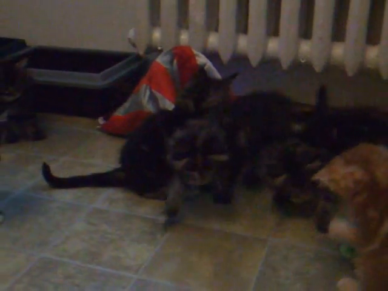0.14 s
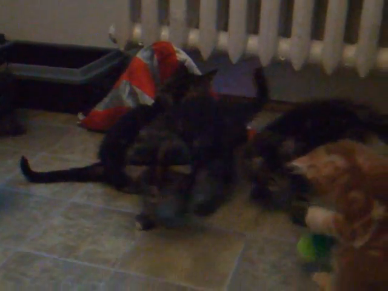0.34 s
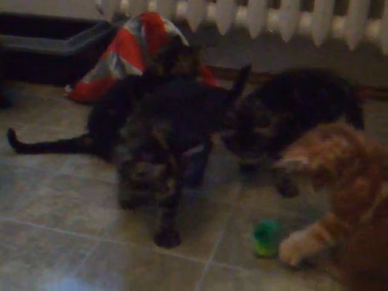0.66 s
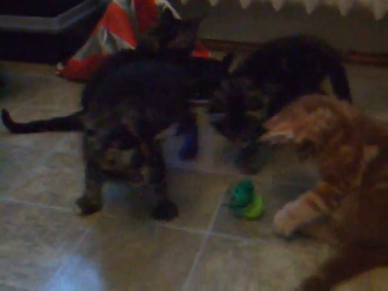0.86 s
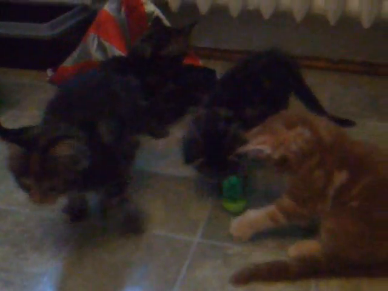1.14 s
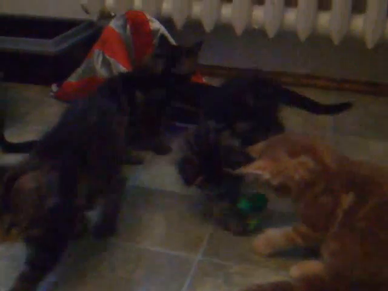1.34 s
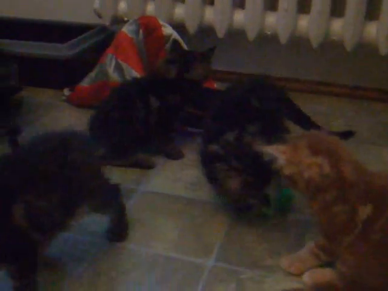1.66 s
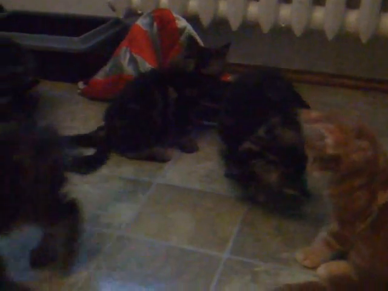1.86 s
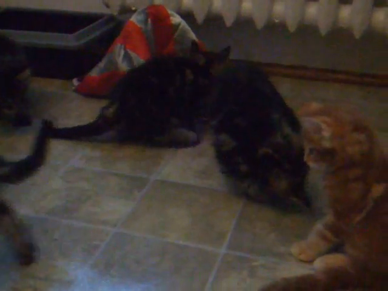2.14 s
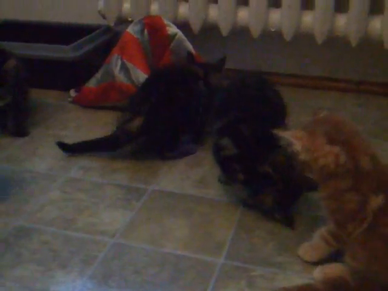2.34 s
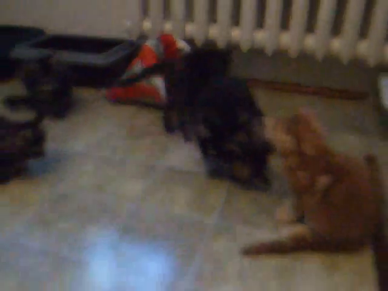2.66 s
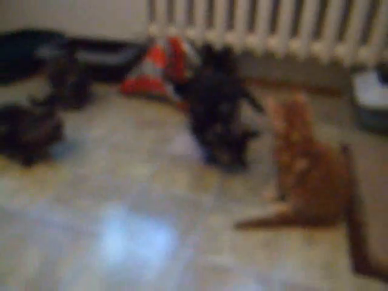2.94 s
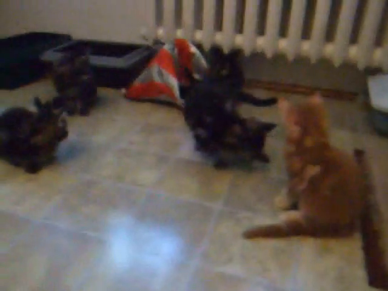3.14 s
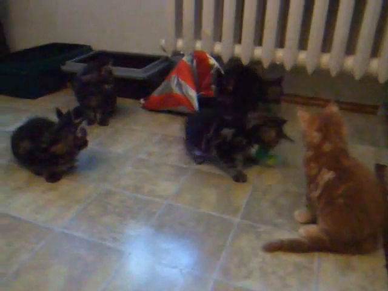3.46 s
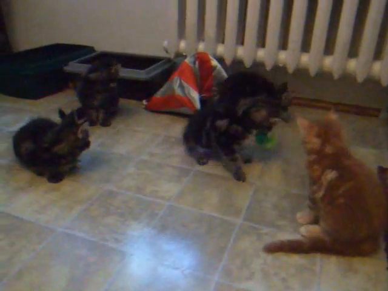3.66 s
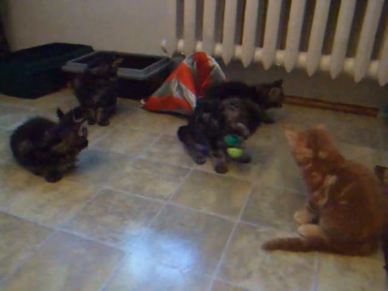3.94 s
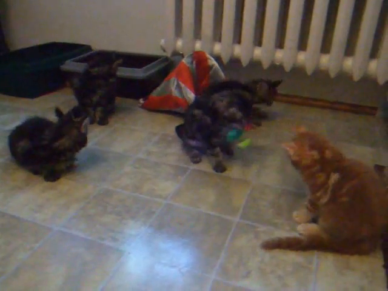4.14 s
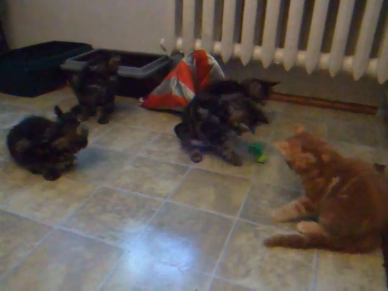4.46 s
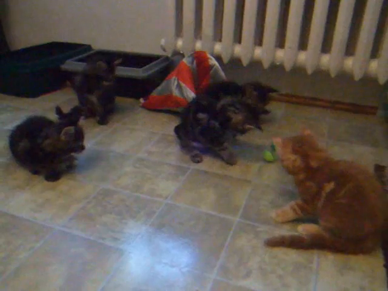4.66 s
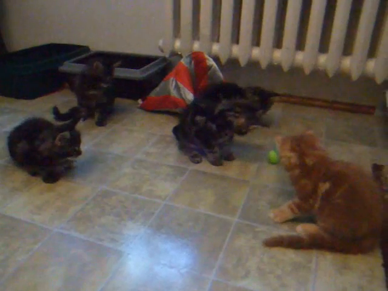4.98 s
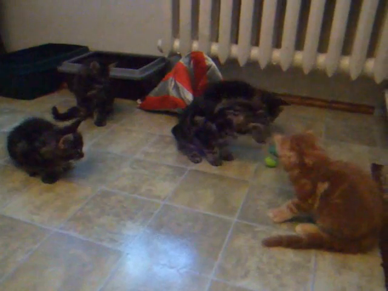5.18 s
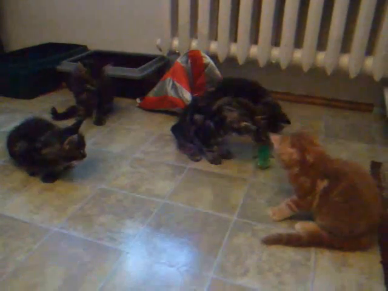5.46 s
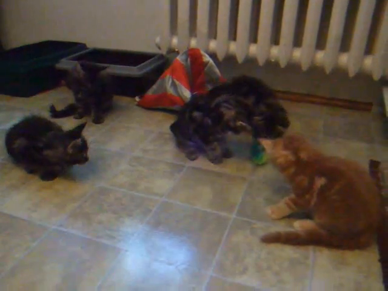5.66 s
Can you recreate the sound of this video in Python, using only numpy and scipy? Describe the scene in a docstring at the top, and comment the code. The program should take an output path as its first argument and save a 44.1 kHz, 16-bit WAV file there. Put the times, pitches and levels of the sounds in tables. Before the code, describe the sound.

Close, dry focus-motor ticks run in quick uneven strings from the start, with a hard toy knock echoing in a bare tiled room. Paws shuffle softly, then a zoom motor whirs and grinds with clunks for about half a second. Ticks resume, with a second knock later. The cheap built-in microphone adds hiss, a thin electric whine and harsh, grainy treble.

```python
"""A small camera films kittens on a tile floor. Focus motor steps tick on the picture frames from the start;
a hard toy knocks in the bare room at 0.5 s and paws shuffle from 1.4 s. From 2.5 s the zoom motor whirs on
grinding gears, which coast and grind again to 3.1 s; then focus ticks resume, with a second knock at 4.5 s.
Hiss, an electric whine and two fuzzy tones run throughout. The recorder takes 8-bit samples at a quarter
rate and holds each value, which mirrors all sound into the treble."""
import sys
import numpy as np
from scipy import signal
from scipy.fft import rfft, irfft
from scipy.io import wavfile
from scipy.ndimage import uniform_filter1d

SR = 44100
rng = np.random.default_rng(int(sys.argv[2]) if len(sys.argv) > 2 else 0)


def transcribe(signal):
    """Save signal, clipped to [-1, 1], as a 16-bit WAV file at the path in sys.argv[1]."""
    frames = np.atleast_2d(signal).T
    limited = np.clip(frames, -1, 1)
    pcm = np.round(limited * 32767).astype(np.int16)
    wavfile.write(sys.argv[1], SR, pcm)


N = 256220

# Focus steps. Each row: start in s, clack peak in dB, clack in Hz, shell thud in dB re clack before THUD_TRIM_DB.
STEPS = [(0.0034, -22.5, 2060, -23), (0.0713, -29, 1430, -1.5), (0.1372, -21, 2130, -32),
         (0.204, -35, 1960, 6.5), (0.27, -23, 2190, -29), (0.3374, -33.5, 2000, 7),
         (0.404, -26.5, 2180, -29), (0.47, -29.5, 1450, 2.5), (0.7024, -38, 1500, 1),
         (0.7353, -31, 1720, -9), (0.8042, -28.5, 1650, 0), (0.836, -26.5, 1540, -9),
         (0.8694, -25.5, 1690, -9.5), (0.9023, -29.5, 1670, -3), (0.936, -23.5, 1680, -14),
         (0.97, -24, 1720, -10.5), (1.0022, -23, 1610, -12.5), (1.036, -22.5, 1580, -13),
         (1.0694, -25, 1730, -11.5), (1.1025, -22.5, 1700, -9.5), (1.135, -24, 1810, -8),
         (1.1692, -21.5, 1730, -10.5), (1.2027, -23, 1620, -11), (1.27, -31, 1870, -1),
         (1.336, -21.5, 1750, -13), (3.1745, -19.5, 1700, -13.5), (3.2988, -22, 1690, -7),
         (3.374, -31, 1730, -18), (3.4366, -19, 1580, -15), (3.5032, -23, 1810, -12),
         (3.57, -31, 1700, -6.5), (3.6365, -22, 1770, -14), (3.703, -25.5, 1650, -7),
         (3.77, -21.5, 1720, -15), (3.8363, -27, 1620, -5.5), (3.903, -19, 1790, -15.5),
         (3.9703, -24, 1650, -9), (4.002, -25.5, 1600, -10.5), (4.035, -25, 1520, -16),
         (4.069, -22, 1680, -14), (4.1022, -26, 1710, -7.5), (4.169, -39, 1710, -2),
         (4.2019, -18, 1720, -18.5), (4.2357, -21, 1750, -17), (4.2692, -21.5, 1820, -19),
         (4.3017, -20, 1740, -16.5), (4.3349, -21.5, 1770, -18), (4.3682, -36, 1700, -24),
         (4.4361, -21.5, 1760, -10), (4.602, -27.5, 1750, -7), (4.6694, -25.5, 1740, -15),
         (4.702, -22, 1790, -16), (4.7352, -24.5, 1700, -15), (4.7691, -21, 1740, -25),
         (4.801, -24.5, 1740, -14), (4.835, -21.5, 1780, -20), (4.9022, -28.5, 1700, -7)]
# Lens barrel modes. Each row: frequency in Hz, relative level in dB, t60 in s.
BARREL_MODES = [(1745, 0, 0.067), (1432, 1, 0.033), (2072, -3.5, 0.034)]
# Camera shell modes. Each row: frequency in Hz, relative level in dB, t60 in s.
SHELL_MODES = [(856, 0, 0.044), (639, 0, 0.035), (1052, -1, 0.033)]
# Rasp of a step. Each row, zoomed in then out: level running, level from rest, in dB before RASP_TRIM_DB.
RASP_DB = [(-45, -35.5), (-42.5, -37)]
# Share of the clack's excess over CLACK_DB that the rasp takes on (ratio), zoomed in then out.
RASP_FOLLOWS = [0.57, 0.034]
# Rotor rebound. Each row, zoomed in then out: level running, level from rest, in dB.
REBOUND_DB = [(-35.5, -34.5), (-34.5, -36)]
# Barrel ring. Each row, zoomed in then out: level running, level from rest, in dB.
RING_DB = [(-37, -36), (-34.5, -31.5)]
# Random spread of rasp, rebound and ring, standard deviations in dB.
SCATTER_DB = np.array([1.5, 3.5, 2.2])
CLACK_DB, THUD_TRIM_DB, RASP_TRIM_DB = -27, -2.5, 8
REST_S = 0.05  # a step after a longer pause starts from rest, unless it runs on freely
ZOOMED_OUT_S = 2.5  # from here the lens sits further back in the barrel

# Focus motor running freely. Each row: start in s, stop in s, level in dB.
SLEWS = [(1.337, 1.357, -39.5), (3.183, 3.291, -43)]
# Modes of the free run. Each row: frequency in Hz, relative level in dB, t60 in s.
SLEW_MODES = [(1490, -1.5, 0.012), (1656, 0.5, 0.02), (2110, 1, 0.018), (2950, -4.5, 0.01)]
SLEW_STEPS_PER_S = 292

# Zoom motor. Each row: time in s, shaft rate in Hz, level of low and of high multiples in dB.
SHAFT = [(2.558, 128.2, -44, -51), (2.595, 125.6, -40.5, -48), (2.62, 125.9, -39.5, -46),
         (2.68, 128.4, -40, -44.5), (2.75, 130.2, -38, -45), (2.835, 132.8, -37, -42),
         (2.93, 133, -36.5, -43.5), (2.94, 137, -47, -55)]
# Low multiples of the shaft rate. Each row: multiple, relative level in dB before waver.
LOW_ORDERS = [(2, -15), (3, -13), (4, -9), (5, -8), (6, -11), (7, -12), (9, -17), (11, -12), (12, 0),
              (13, -19), (15, -15), (17, -19), (18, -16)]
# High multiples of the shaft rate. Each row: multiple, relative level in dB before waver.
HIGH_ORDERS = [(21, -10), (24, -5), (25, -5), (27, 0), (29, -8), (30, -5), (39, -6)]
# Zoom gears, loud as they engage and stop, coasting between two runs. Each row: time in s, grinding in dB.
GEARS = [(2.49, -56), (2.5, -37.5), (2.554, -32), (2.6, -40), (2.834, -39), (2.898, -38.5), (2.942, -34),
         (2.95, -40), (3.01, -44.5), (3.021, -31.5), (3.101, -34), (3.108, -41)]
# Spectrum of the grinding. Each row: frequency in Hz, relative density in dB per Hz.
GRIND_TONE = [(410, -24.5), (700, -8), (930, -25.5), (1050, -17), (1220, -16.5), (1620, -9), (1840, -20.5),
              (3570, -12.5), (4210, -13.5), (4630, -19), (5500, -10), (7150, -44), (12100, -120)]
# Housing rumble as the zoom jolts. Each row: peak in s, level in dB, t60 in s.
JOLTS = [(2.556, -39, 0.7), (2.834, -41, 0.11), (2.944, -41, .3), (3.092, -39.5, .06)]
JOLT_RISE_DB_PER_S, GEAR_HUM_DB, GEAR_RUMBLE_DB = 598, -52.5, -63
# Gear clunks. Each row: start in s, snap level in dB, shell thump in dB re snap.
CLUNKS = [(2.4962, -27, -19), (2.532, -21.5, -11), (2.5569, -16.5, 2), (2.9374, -21.5, -16),
          (3.021, -22, -30), (3.072, -25, -2), (3.0788, -27, -11), (3.1004, -33, 2)]
# Shell hums up as gears bind or the focus motor runs. Each row: start in s, length in s, peak in dB.
HUMS = [(2.516, 0.039, -31), (2.934, 0.016, -28), (3.009, 0.012, -36.5), (3.038, 0.023, -29.5),
        (3.099, 0.01, -24.5), (3.182, 0.1, -45.5)]

# Toy knocks. Each row: start in s, blow in dB, room in dB before build-up, build-up time in s.
KNOCKS = [(0.4979, 5.5, -17, 0.0075), (4.4557, 5, -12, 0.046)]
# Modes of the blow, one list a knock. Each row: frequency in Hz, level in dB re blow, t60 in s.
BLOW_MODES = [
    [(1285, 6, 0.0035), (2600, -16, 0.0076), (4660, -12, 0.0042)],
    [(2480, -1.5, 0.0053), (3020, 3, 0.0049), (1490, -15, 0.023), (4030, -3.5, 0.0057), (540, -20, 0.0081)],
]
# Room tail spectrum, one list a knock. Each row: frequency in Hz, relative density in dB per Hz.
KNOCK_TONES = [
    [(60, -45), (150, -41), (260, -10), (420, -7), (630, -2), (900, -9.5), (1300, -9.5), (1900, -12.5),
     (2700, -17.5), (3300, -30.5), (5500, -33)],
    [(40, -45), (85, -20.5), (130, -24), (200, -10.5), (300, -13.5), (400, -5), (700, -5.5), (1200, -14),
     (1750, -7), (2300, -10), (3000, -7.5), (3800, -19.5), (5500, -25)],
]
# Wall echoes, one list a knock. Each row: delay in s, level in dB re blow.
ECHOES = [
    [(.0035, -23), (.0117, -13), (.0148, -16), (.038, -14)],
    [(.0035, -9.5), (.0152, -10.5), (.030, -32), (.048, -21)],
]
# Room decay. Each row: frequency in Hz, t60 in s.
ROOM_T60 = [(150, 0.51), (300, 0.51), (700, 0.4), (1500, 0.46), (3000, 0.32), (5500, 0.46)]

# Paws and fur on the tiles. Each row: time in s, shuffle in dB.
PAWS = [(1.38, -57.5), (1.61, -46), (1.624, -36), (1.728, -51.5), (1.85, -56.5), (1.944, -45),
        (1.99, -52.5), (2.16, -59), (2.4, -63.5)]
# Shuffle spectrum. Each row: frequency in Hz, relative density in dB per Hz.
PAW_TONE = [(71, -46), (120, -21), (145, -37), (161, -11), (380, -1), (654, -11), (898, -17), (2000, -28.5),
            (2600, -62), (4400, -120)]
# Dull thumps of paws on the floor and of the zoom gears as they jolt and stop.
# Each row: start in s, level in dB, frequency in Hz.
BUMPS = [(1.621, -40, 382), (1.651, -30, 401), (1.749, -38, 357), (1.94, -33, 560), (2.555, -21, 570),
         (2.835, -36, 278), (2.945, -32, 127), (2.965, -29.5, 224), (2.974, -35, 229.2), (2.981, -38, 269),
         (3.798, -34, 112)]

# Two fuzzy tones. Each row: time in s, shell hum and faint whistle in dB before waver.
FUZZ = [(0.0, -58, -62.5), (0.75, -53, -67.5), (1.05, -49, -68.5), (1.3, -55.5, -55), (1.49, -51, -61.5),
        (2.08, -59, -61.5), (2.45, -56.5, -59.5), (3.15, -60, -51.5), (3.53, -56.5, -57.5),
        (4.4, -62, -57.5), (4.95, -64, -64), (5.2, -60, -52.5), (5.81, -61, -58)]
FUZZ_WAVER_DB = 2
# Hiss spectrum. Each row: frequency in Hz, relative density in dB per Hz.
HISS_TONE = [(15, -25), (25, -2), (111, 0.5), (286, -5), (343, -4), (439, -6.5), (481, -8.5), (826, -6),
             (1010, -7.5), (1390, -11.5), (2390, -11), (2860, -10), (3200, -5.5), (4010, -10.5),
             (5500, -11), (7150, -44), (12100, -120)]
# Bumps in the hiss spectrum. Each row: frequency in Hz, width in Hz, level in dB.
HISS_BUMPS = [(2873, 150, -55.5), (4080, 340, -55.5), (5285, 340, -54)]
HISS_DB = -48.5  # before the patches
WHINE_HZ, WHINE_RMS_DB = 3907.5, -55.5

HOLD_SAMPLES = 4
LEVELS = 128  # 8-bit steps from zero to full scale
BAND_HZ, EDGE_HZ = 5450, 15560


def amp(db):
    """Decibels to amplitude ratio."""
    return 10 ** (np.asarray(db) / 20)


def evened(x):
    """Scales x to unit RMS."""
    return x / np.sqrt(np.mean(x ** 2) + 1e-20)


def noise(count):
    """White noise of unit variance."""
    return rng.standard_normal(count)


def smoothed_twice(x, size):
    """Two running means in a row."""
    return uniform_filter1d(uniform_filter1d(x, size=size), size=size)


def read(points, hz):
    """Interpolates a table over log frequency."""
    f, value = np.transpose(points)
    return np.interp(np.log(hz + 1), np.log(f + 1), value)


def add(mix, start_s, sound):
    """Adds sound into mix in place, cut at the end."""
    part = mix[max(round(start_s * SR), 0):][:len(sound)]
    part += sound[:len(part)]


def coloured(x, tone):
    """Filters x by a spectrum, nothing above the recorder's band, to unit RMS."""
    hz = np.fft.rfftfreq(len(x), 1 / SR)
    in_band = hz < SR / HOLD_SAMPLES / 2
    return evened(irfft(rfft(x) * amp(read(tone, hz)) * in_band, len(x)))


def fuzzy(count, hz, width_hz):
    """Noise through one narrow two-pole resonance."""
    r = np.exp(-np.pi * width_hz / SR)
    poles = [1, -2 * r * np.cos(2 * np.pi * hz / SR), r * r]
    return evened(signal.lfilter([1, 0, -1], poles, noise(count)))


def ring(modes, t, rise_s):
    """Struck modes decaying from a soft start, phases random."""
    swing = sum(amp(db - 60 * t / t60_s) * np.sin(2 * np.pi * (hz * t + rng.random()))
                for hz, db, t60_s in modes)
    return swing * (1 - np.exp(-t / rise_s))


def columns(rows):
    """Start time, short end fades and interpolated columns of a curve table."""
    s, *values = np.transpose(rows)
    t = np.arange(s[0], s[-1], 1 / SR)
    fade = signal.windows.tukey(len(t), min(0.002 * SR / len(t), 1))
    return s[0], fade, [np.interp(t, s, v) for v in values]


def step(db, hz, thud_db, rasp_db, rebound_db, ring_db):
    """The rotor snaps, rebounds, and leaves barrel and shell ringing; levels after db are re clack."""
    t = np.arange(3000) / SR
    rise_s = 0.0012 * (hz / 1750) ** 0.46  # higher clacks last longer
    clack = np.sin(2 * np.pi * hz * t) * (t / rise_s * np.exp(1 - t / rise_s)) ** 3.8
    held = np.exp(-(t / 0.019) ** 6)  # the barrel sings until the coil lets go
    out = clack + amp(ring_db) * ring(BARREL_MODES, t, rise_s=0.00052) * held
    rasp = coloured(noise(len(t)), [(1500, -9.0), (2500, -1.5), (3200, 0.5), (4400, -4.5), (5500, -6)])
    out = out + amp(rasp_db + RASP_TRIM_DB - 60 * t / 0.022) * rasp * np.minimum(t / 0.0012, 1)
    add(out, 0.0043, amp(rebound_db) * clack)
    add(out, 0.003, amp(thud_db + THUD_TRIM_DB) * ring(SHELL_MODES, t, rise_s=0.00077))
    return amp(db) * out


def focus():
    """Rasp, rebound and ring of each step depend on rest and zoom, and scatter by chance."""
    out, last_s = np.zeros(N), -np.inf
    for (s, db, hz, thud_db), chance in zip(STEPS, noise((len(STEPS), 3))):
        zoom = int(s > ZOOMED_OUT_S)
        runs_on = any(0 < start_s - s < REST_S for start_s, *_ in SLEWS)
        rested = int(s - last_s > REST_S and not runs_on)
        rasp_db = RASP_DB[zoom][rested] + RASP_FOLLOWS[zoom] * (db - CLACK_DB)
        parts_db = np.array([rasp_db, REBOUND_DB[zoom][rested], RING_DB[zoom][rested]])
        parts_db = parts_db + SCATTER_DB * chance
        add(out, s, step(db, hz, thud_db, *(parts_db - db)))
        last_s = s
    return out


def slew(start_s, stop_s, db):
    """Focus steps follow so fast that their uneven snaps merge into a buzz."""
    at_s = np.arange(0, stop_s - start_s, 1 / SLEW_STEPS_PER_S)
    kicks = np.zeros(round((stop_s - start_s) * SR) + 40)
    t = np.arange(1500) / SR
    late, size = noise((len(at_s), 2)).T
    index = ((at_s + 0.00006 * late) * SR).astype(int)
    kicks[np.clip(index, 0, len(kicks) - 1)] = amp(3 * size)
    return amp(db) * evened(signal.fftconvolve(kicks, ring(SLEW_MODES, t, rise_s=0.00017)))


def motor(rows):
    """Zoom motor: multiples of the shaft rate, each wavering a little in level."""
    s, fade, (hz, low_db, high_db) = columns(rows)
    turns = np.cumsum(hz) / SR

    def stack(orders):
        """Sums the multiples, phases random."""
        total = np.zeros(len(hz))
        for multiple, db in orders:
            waver_db = 1.2 * evened(smoothed_twice(noise(len(hz)), 900))
            total += amp(db + waver_db) * np.cos(2 * np.pi * (multiple * turns + rng.random()))
        return total

    whir = amp(low_db) * stack(LOW_ORDERS) + amp(high_db) * stack(HIGH_ORDERS)
    return s, np.sqrt(2) * fade * whir


def gears(rows):
    """Teeth grind, the shell hums and the housing rumbles."""
    s, fade, (grind_db,) = columns(rows)
    count = len(fade)
    t = s + np.arange(count) / SR
    rumble_gain = amp(GEAR_RUMBLE_DB)
    for peak_s, db, t60_s in JOLTS:
        after_s = t - peak_s
        rumble_gain = rumble_gain + amp(db + np.minimum(JOLT_RISE_DB_PER_S * after_s, -60 * after_s / t60_s))
    grit = noise(count) * amp(1.2 * evened(uniform_filter1d(noise(count), size=90)))
    grind = amp(grind_db) * coloured(grit, GRIND_TONE)
    rumble = coloured(noise(count), [(50, -28.5), (130, -5.5), (300, -12), (500, -11), (2000, -38.5)])
    shell_hum = amp(GEAR_HUM_DB) * fuzzy(count, 661, 36)
    return s, fade * (grind + shell_hum + rumble_gain * rumble)


def clunk(db, thump_db):
    """A short broad snap of the gears and a thump of the shell."""
    t = np.arange(1500) / SR
    snap = coloured(noise(len(t)), GRIND_TONE) * amp(-60 * t / 0.011)
    thump = ring(SHELL_MODES[1:2] + [(449, -4.5, 0.026)], t, rise_s=0.00026)
    return amp(db) * (snap + amp(thump_db) * thump)


def hum(length_s, db):
    """One half-sine swell of the shell's main mode."""
    t = np.arange(0, length_s, 1 / SR)
    return amp(db) * np.sin(np.pi * t / length_s) * np.sin(2 * np.pi * (645 * t + rng.random()))


def knock(db, room_db, build_s, modes, tone, echoes):
    """A hard blow, its inverted wall echoes and a dense tail decaying at a rate set by frequency."""
    t = np.arange(SR) / SR
    blow = sum(amp(db + d - 60 * t / t60_s) * np.sin(2 * np.pi * hz * t) for hz, d, t60_s in modes)
    blow = signal.lfilter(*signal.butter(2, 300, "high", fs=SR), blow)  # a small toy moves little bass
    out = blow.copy()
    dulled = uniform_filter1d(blow, size=7)  # walls swallow some treble
    for delay_s, echo_db in echoes:
        add(out, delay_s, -amp(echo_db) * dulled)
    taps = np.zeros(SR)  # one reflection of random sign and size in every ten samples
    at = np.arange(0, SR - 10, 10) + rng.integers(0, 10, SR // 10 - 1)
    taps[at] = rng.choice([-1., 1.], len(at)) * amp(5.7 * noise(len(at)))
    hz, frame_s, z = signal.stft(coloured(taps, tone), SR, nperseg=256)
    decay = amp(-60 * frame_s / read(ROOM_T60, hz)[:, None])
    tail = signal.istft(z * decay, SR, nperseg=256)[1][:SR]
    build_up = (0.44 + 0.83 * np.minimum(t / build_s, 1)) * np.minimum(t / 0.0006, 1)
    add(out, 0.001, amp(room_db) * tail * build_up)
    return out


def paws(rows):
    """Paws and fur shuffle on the tiles: shaped noise under a level curve."""
    s, fade, (paw_db,) = columns(rows)
    return s, fade * amp(paw_db) * coloured(noise(len(fade)), PAW_TONE)


def bump(db, hz):
    """A dull, quickly damped thump of two modes."""
    return amp(db) * ring([(hz, 0, 0.05), (2.22 * hz, -7, 0.03)], np.arange(3000) / SR, rise_s=0.0023)


def fuzz(rows):
    """A shell hum and a faint whistle: narrow noise, each wavering slowly."""
    s, fade, (hum_db, whistle_db) = columns(rows)
    out = np.zeros(len(fade))
    for db, hz, width_hz in [(hum_db, 626, 54), (whistle_db, 1013, 84)]:
        waver_db = FUZZ_WAVER_DB * evened(smoothed_twice(noise(len(fade)), 4000))
        out += amp(db + waver_db) * fuzzy(len(fade), hz, width_hz)
    return s, fade * out


def floor():
    """Microphone hiss with soft patches, a few spectral bumps and a steady electric whine."""
    _, _, z = signal.stft(coloured(noise(N), HISS_TONE), SR, nperseg=1024)
    over_hz = uniform_filter1d(noise(z.shape), 10, 0)
    patches_db = 2.35 * evened(uniform_filter1d(over_hz, 12, 1))
    hiss = amp(HISS_DB) * signal.istft(z * amp(patches_db), SR, nperseg=1024)[1][:N]
    bumps = sum(amp(db) * fuzzy(N, hz, width_hz) for hz, width_hz, db in HISS_BUMPS)
    whine = np.sqrt(2) * amp(WHINE_RMS_DB) * np.sin(2 * np.pi * WHINE_HZ * np.arange(N) / SR)
    return hiss + bumps + whine


def scene():
    """All sources at the one microphone."""
    mix = focus() + floor()
    for start_s, *row in SLEWS:
        add(mix, start_s, slew(start_s, *row))
    add(mix, *motor(SHAFT))
    add(mix, *gears(GEARS))
    for source, rows in [(clunk, CLUNKS), (hum, HUMS), (bump, BUMPS)]:
        for start_s, *row in rows:
            add(mix, start_s, source(*row))
    for (start_s, *row), *sound in zip(KNOCKS, BLOW_MODES, KNOCK_TONES, ECHOES):
        add(mix, start_s, knock(*row, *sound))
    add(mix, *paws(PAWS))
    add(mix, *fuzz(FUZZ))
    return mix[None]


def record(dry):
    """Band limit, overload, 8-bit samples rounded down and held at a quarter rate, then a low-pass."""
    narrow = signal.oaconvolve(dry, signal.firwin(127, BAND_HZ, fs=SR)[None], "same")
    overloaded = np.clip(narrow, -0.97, 0.97)
    samples = np.floor(overloaded[:, ::HOLD_SAMPLES] * LEVELS) / LEVELS
    held = np.repeat(samples, HOLD_SAMPLES, axis=1)[:, :N]
    low_pass = signal.firwin(1535, EDGE_HZ, window=("kaiser", 9), fs=SR)
    out = signal.oaconvolve(held, low_pass[None], "same")
    return np.clip(out, -1, 1)


dry = scene()
out = record(dry)
transcribe(out)
```